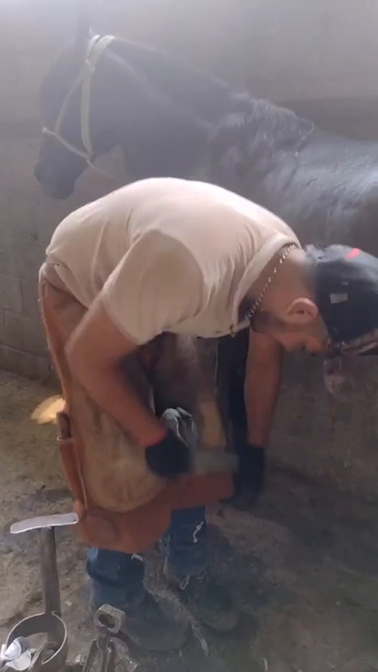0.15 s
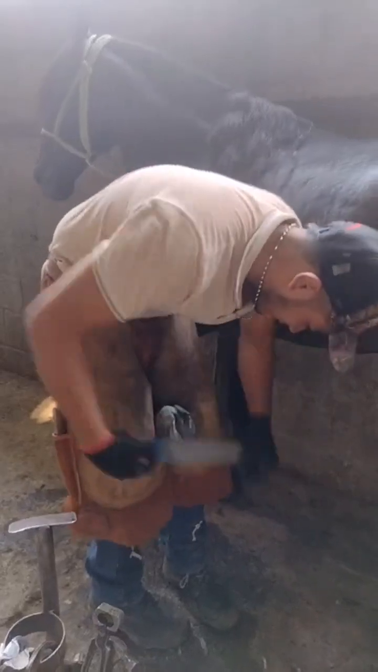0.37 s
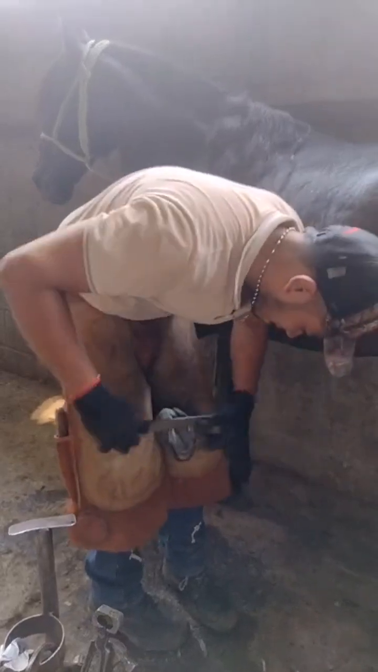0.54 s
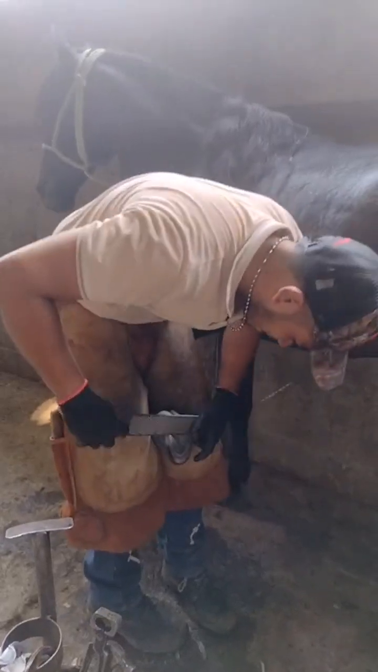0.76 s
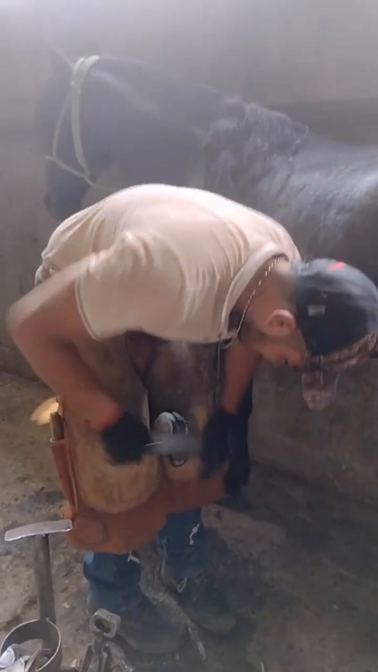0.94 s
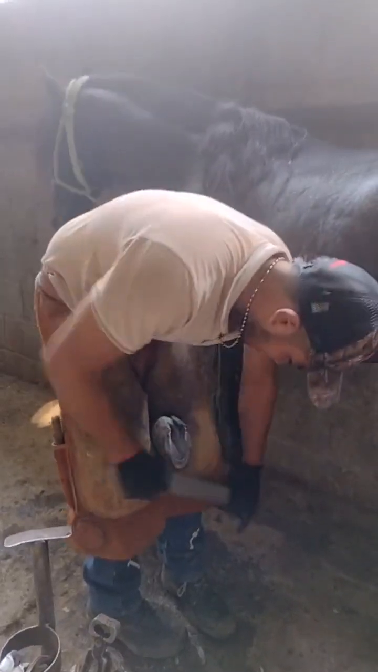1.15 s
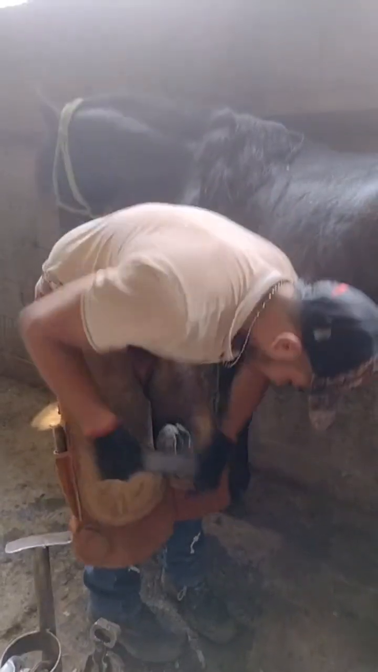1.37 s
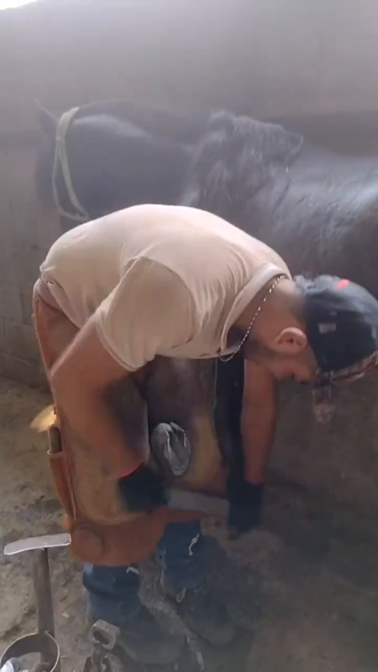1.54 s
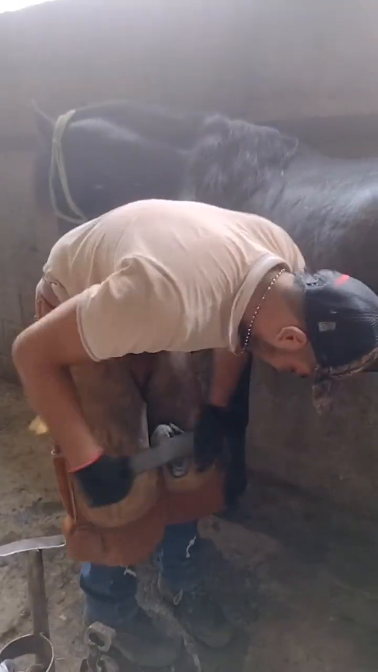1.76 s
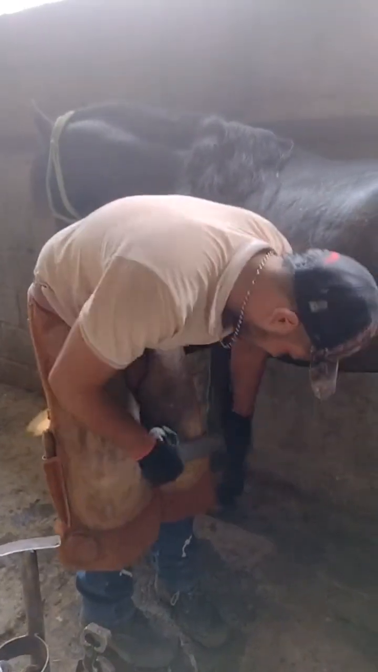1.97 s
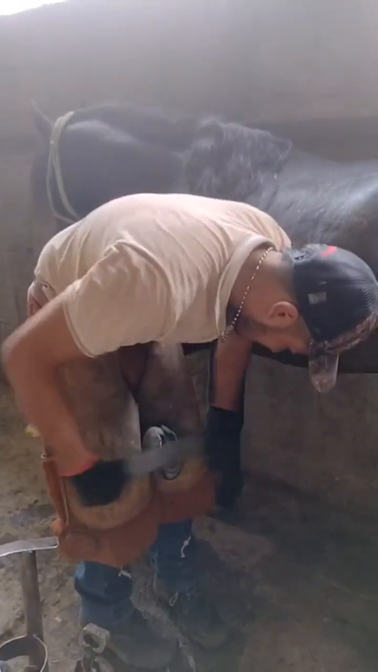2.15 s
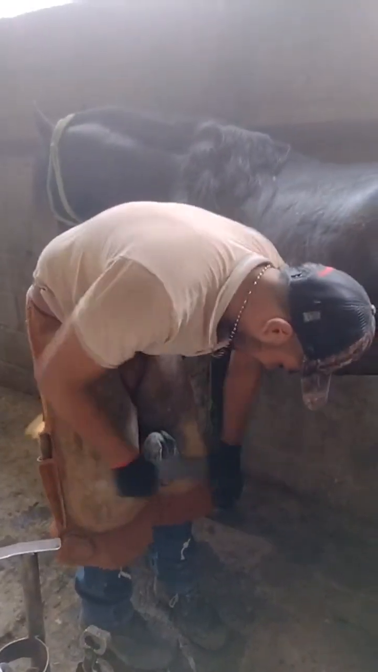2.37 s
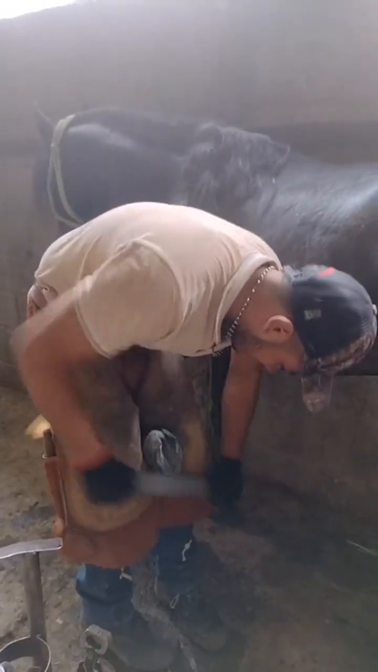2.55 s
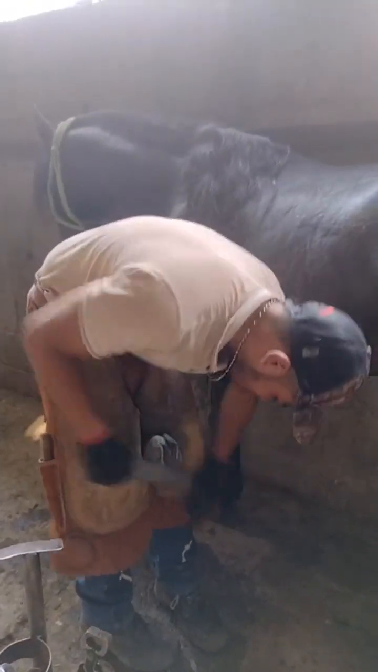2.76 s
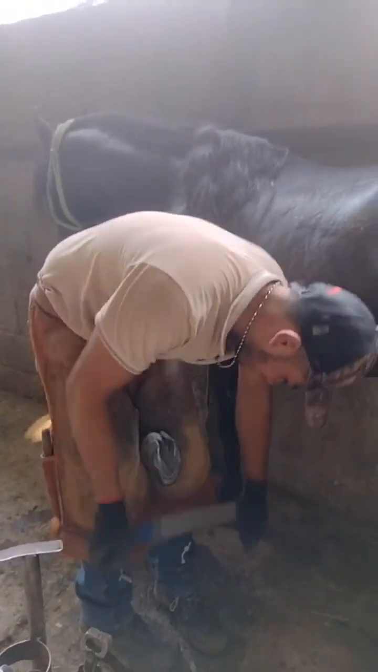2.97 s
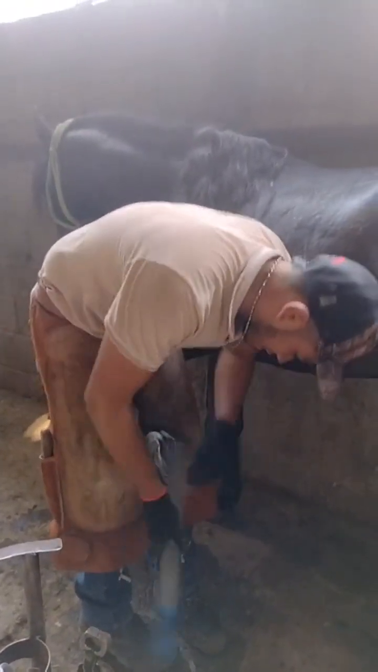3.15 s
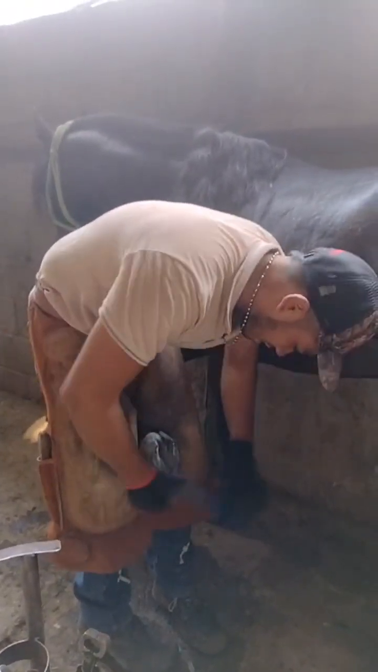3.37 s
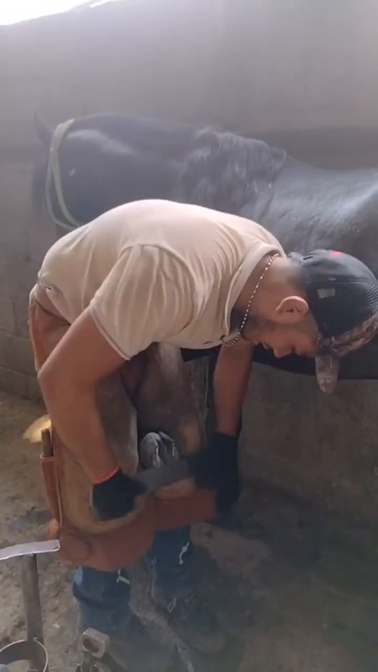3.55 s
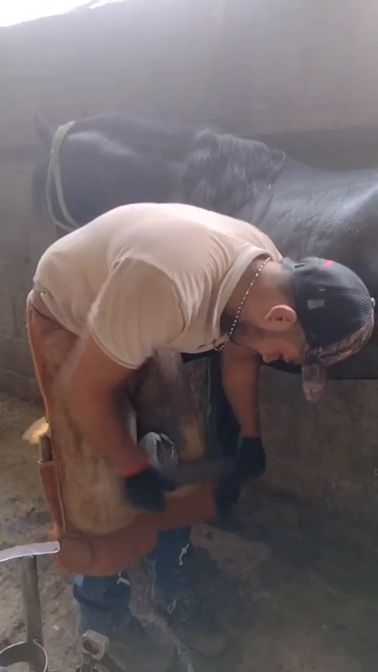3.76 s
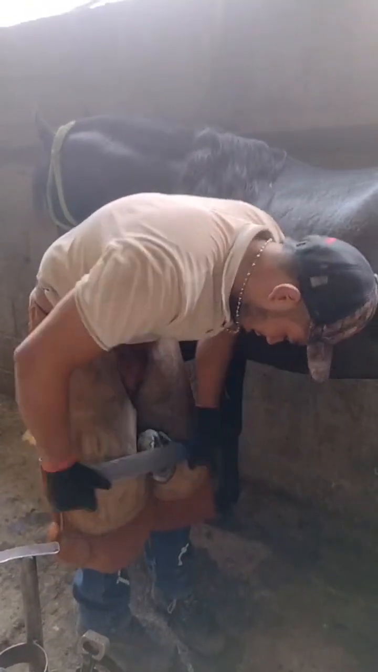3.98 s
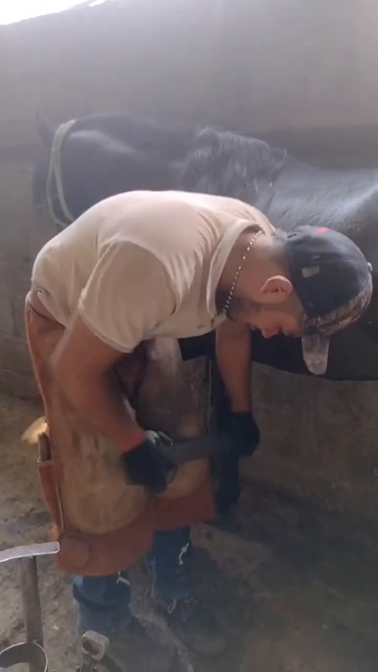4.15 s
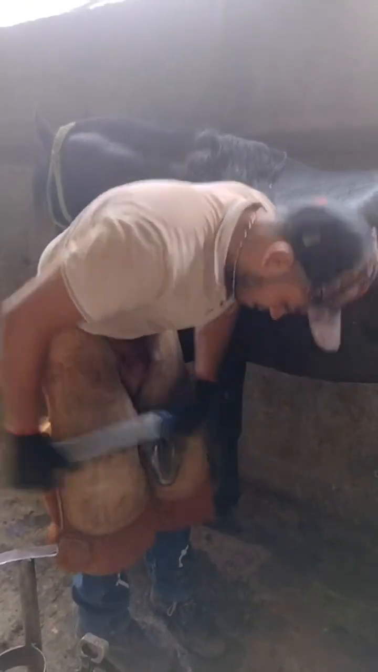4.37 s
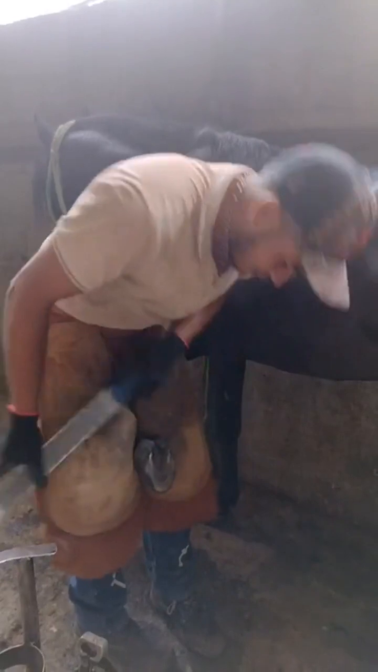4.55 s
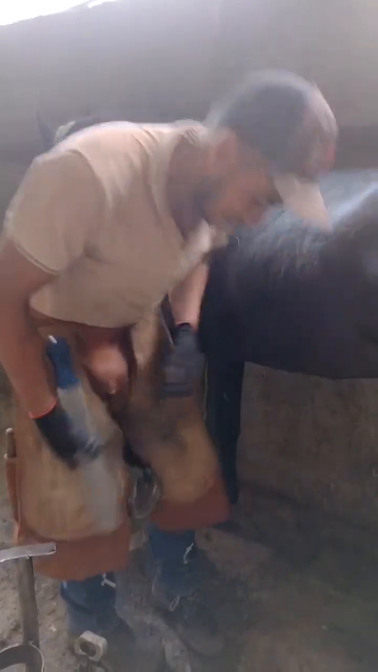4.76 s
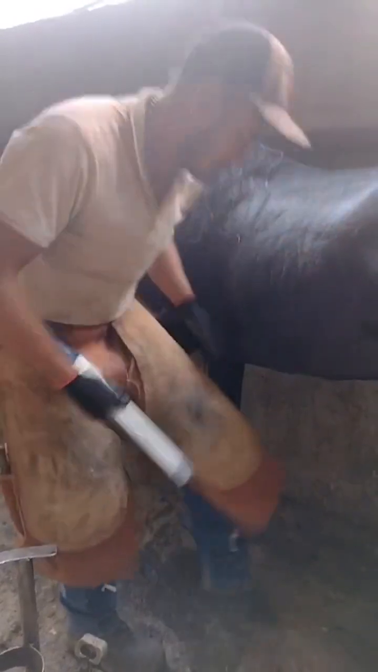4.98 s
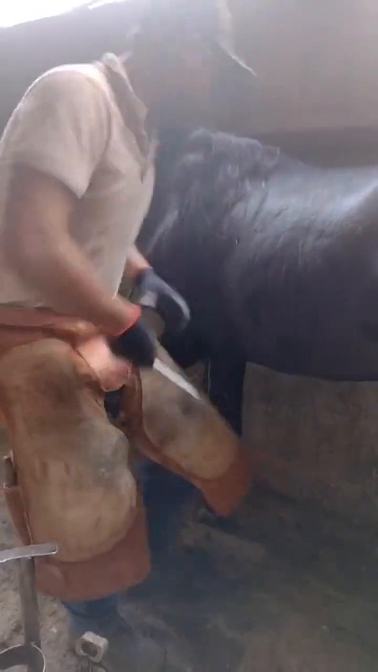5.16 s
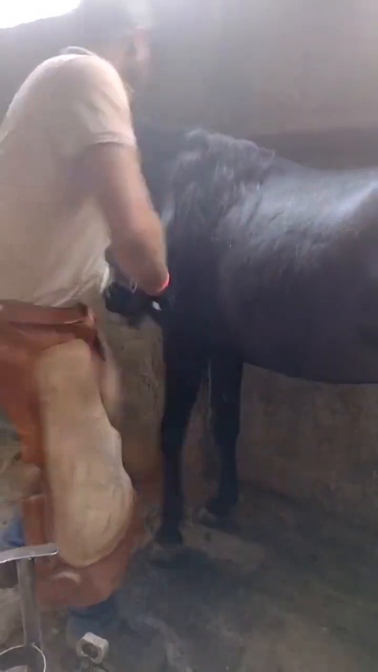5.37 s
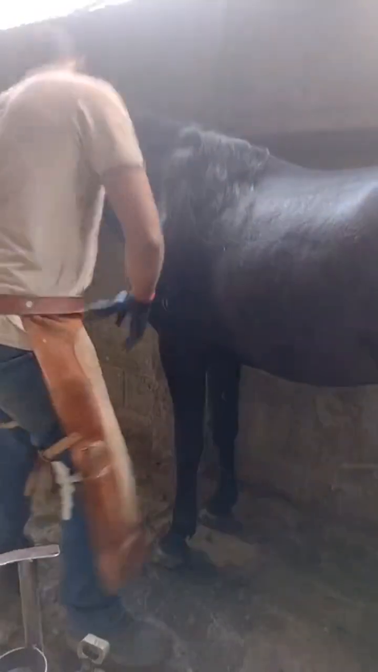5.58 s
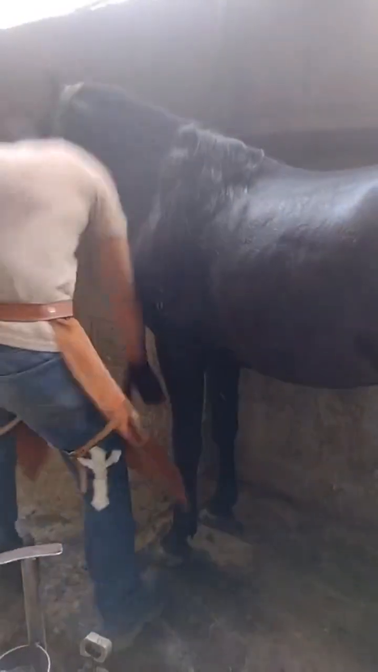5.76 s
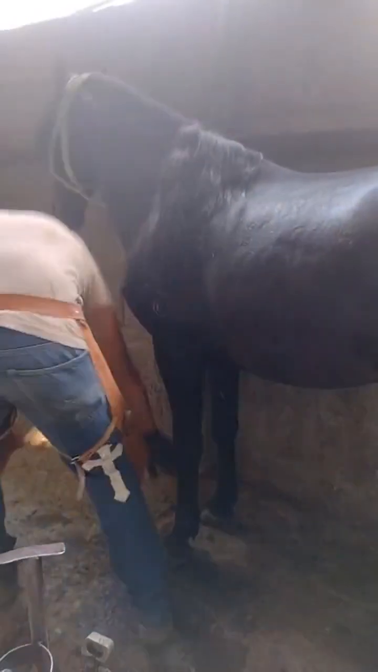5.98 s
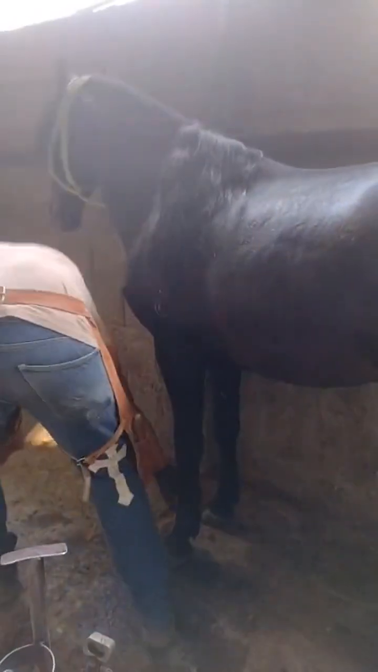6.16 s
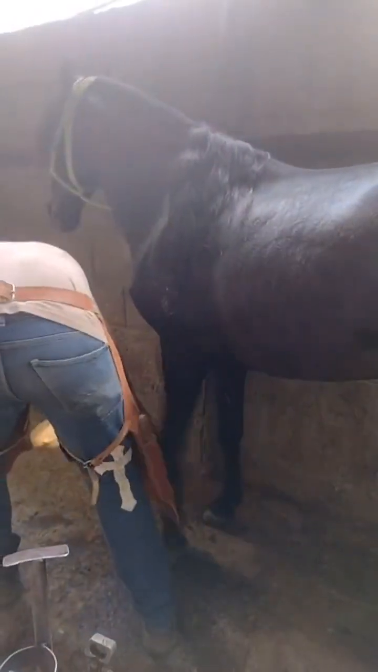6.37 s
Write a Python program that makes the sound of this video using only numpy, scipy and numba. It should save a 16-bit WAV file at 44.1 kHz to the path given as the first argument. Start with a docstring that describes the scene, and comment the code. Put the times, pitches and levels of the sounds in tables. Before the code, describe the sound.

Close by in a small masonry stable, a steel rasp files hoof horn in separate rough strokes, buzzing and hissing with a bright metallic ring. Light knocks and dull leg bumps fall between them. After a heavier thump and clunk, the last strokes grow louder and sharper, with a crackle and brief squeal. Then leather and cloth rustle, a few knocks sound, and it quietens. A small microphone suppresses the faint pauses.

```python
"""A farrier rasps a horse's hoof in a small masonry stable, then lets the leg down and steps away.
Rows of teeth catch the horn at a rate that follows the stroke: they make the hoof buzz and tear off
chips that ring the steel. The rasp knocks as it lands, teeth snag, the leg shudders and bumps, and the
leather apron rustles. Near walls reflect it all; a noise suppressor pushes down the faint pauses."""
import sys
import numpy as np
from scipy import signal
from scipy.fft import rfft, irfft
from scipy.io import wavfile
from scipy.ndimage import uniform_filter1d
from numba import njit

SR = 44100
rng = np.random.default_rng(int(sys.argv[2]) if len(sys.argv) > 2 else 0)


def store_wav(level_fs):
    """Save 16-bit WAV to argv[1]."""
    pcm = np.round(np.clip(np.atleast_2d(level_fs), -1, 1) * 32767)
    wavfile.write(sys.argv[1], SR, pcm.T.astype(np.int16))


N = 283122
TIME = np.arange(N) / SR

# strokes of the rasp; the four levels are peaks before the layer trims:
# start_s, attack_s, hold_s, release_s, hoof_body_db, hoof_buzz_db, steel_rasp_db, chip_hiss_db,
# top_rate_rows_per_s, time_to_top_speed_s, slowing_s, regularity_0_to_1 (mean), blade_ring_hz, blade_ring_db
STROKES = [ (.149, 0.07, 0.08, 0.19, -45, -42.5, -35.5, -41, 410, 0.16, 0.093, .45, 4540, 12.5),
           (.408, .027, 0.011, 0.11, -61, -69, -47.5, -55, 240, 0.0092, 0.14, 0.7, 5200, -2.5),
           (1.004, 0.11, 0.095, .218, -49, -44, -40, -43.5, 540, 0.17, 0.086, .55, 4550, 13),
           (1.494, 0.051, 0.083, 0.2, -65, -48, -39.5, -41, 560, .125, 0.085, .35, 4810, 11),
           (1.938, 0.072, .11, 0.18, -52, -43.5, -41, -46, 645, .185, 0.73, 0.6, 2400, -1.5),
           (2.413, 0.067, 0.087, 0.16, -66, -47, -36.5, -44, 600, .165, 0.27, 0.3, 4582, 5),
           (2.849, 0.07, 0.055, 0.23, -63.5, -51.5, -38, -41, 570, .13, 0.12, 0, 4830, 12.5),
           (3.085, 0.028, .04, 0.08, -86, -104, -57, -65, 340, .01, .15, 0, 2825, -0.5),
           (3.712, 0.064, 0.07, 0.15, -60.5, -56, -48, -53, 700, .09, .12, .3, 6400, -2),
           (3.957, 0.021, .11, .13, -97, -53.5, -42.5, -38.5, 660, 0.1, .1, 0.78, 6190, 0.5),
           (4.19, 0.044, 0.053, 0.15, -47.5, -48.5, -41, -47.5, 560, .08, .08, .25, 4250, 6),
           (4.372, 0.078, 0.0041, 0.16, -50, -36.5, -33, -28, 750, .125, .2, .85, 6520, -10),
           (4.489, 0.033, .034, 0.13, -38.5, -37, -49.5, -67.5, 760, .007, .065, 0.7, 2190, -0.5), ]


def rasp():
    """Each row of teeth loads the horn and lets go: a push on the hoof and a burst of chips."""
    # edges of hoof body, hoof buzz, steel rasp, chip hiss: low_hz, high_hz
    layer_bands = [(150, 380), (380, 1600), (1600, 7000), (7000, 17000)]
    buzz_db = (-1, -1, 2, 0)   # buzz against chips in each layer
    trim_db = (-1, -.5, 0, 0)
    rate, regular, blade_hz, blade_db = stroke_motion()
    # the teeth fall in and out of step by a 0.17 share, about 35 times a second
    regular = np.clip(regular * (1 + 0.17 * drift(35)), 0, .98)
    uneven_rate = rate * (1 + .045 * drift(260))
    phase = 2 * np.pi * np.cumsum(uneven_rate) / SR
    chips = tooth_chips(phase, regular, blade_hz, blade_db)
    buzz = tooth_buzz(phase)
    out = squeals(phase)
    for layer, edges in enumerate(layer_bands):
        chip_part = np.sqrt(1 - regular ** 2) * rms_one(band(chips, edges))
        buzz_part = regular * from_db(buzz_db[layer]) * band(buzz, edges)
        part = chip_part + buzz_part
        # even out the loudness, so that the pressure of the hands sets it
        steady = part / np.sqrt(uniform_filter1d(part ** 2, size=1200) + 1e-9)
        out = out + from_db(trim_db[layer]) * stroke_pressure(layer) * steady
    return out


def stroke_motion():
    """The stroke speeds up and slows down: tooth rate, regularity, and pitch and level of the blade's ring."""
    slow_share, speed_up_s = 0.3, 0.11   # floor of the rate as a share of the top; time to gather speed
    glide_oct_per_s = 1.4   # the main ring rises as the contact runs along the steel
    ring_s, fade_db = 0.092, 27.5   # it rings most in mid-stroke and fades towards both ends
    rows = np.array(STROKES)
    current = np.maximum(np.searchsorted(rows[:, 0], TIME) - 1, 0)
    start, attack, hold, *_, top_rate, speed_peak, slowing, regular, ring_hz, ring_db = rows[current].T
    past_peak = TIME - start - speed_peak
    speed = np.exp(-(past_peak / np.where(past_peak < 0, speed_up_s, slowing)) ** 2)
    rate = top_rate * (slow_share + (1 - slow_share) * speed)
    past_middle = TIME - start - attack - hold / 2
    blade_hz = ring_hz * 2 ** (glide_oct_per_s * np.minimum(past_middle, 2 * ring_s))
    blade_db = ring_db - fade_db * (1 - np.exp(-(past_middle / ring_s) ** 2))
    return rate, regular, blade_hz, blade_db


def stroke_pressure(layer):
    """Gain of one layer of the rasping: each stroke bites in, holds and eases off."""
    # share of the attack that each layer needs: the hoof's body answers first
    attack_share = (0.65, 0.95, 0.97, 1.03)
    # how far each layer lies under its peak, in dB: at the start, at the end of the hold
    # (a negative value lies above), and as the rasp lifts off
    entry_db = (14, 17.4, 23.8, 25.2)
    sag_db = (7.5, 0.5, 0.6, -1.85)
    exit_db = (22, 38, 40.4, 36.6)
    touch_s, lift_s = 0.017, 0.019   # time the teeth take to meet the horn, and to leave it
    out = np.zeros(N)
    for start, attack, hold, release, *peak_db in STROKES:
        held = attack + hold
        corners = start + np.array([0, min(attack * attack_share[layer], held), held, held + release])
        drop_db = np.interp(TIME, corners, [entry_db[layer], 0, sag_db[layer], exit_db[layer]])
        contact = np.minimum((TIME - start) / touch_s, (corners[-1] - TIME) / lift_s)
        out += from_db(peak_db[layer] - drop_db) * np.clip(contact, 0, 1)
    return out


def tooth_chips(phase, regular, blade_hz, blade_db):
    """Horn fractures in bursts as each row catches; the chips ring the hoof and the steel."""
    # broad colour of the rasping: freq_hz, density_db_per_hz
    rasp_colour = [(29, -50.5), (50, -5.5), (81, 2.5), (146, -21), (177, -4), (387, -7.5), (586, -3.5),
                   (747, -11.5), (824, -13), (1590, -16.5), (3380, -5.5), (4760, -6.5), (12000, -3.5),
                   (15300, -4), (16900, -48.5)]
    # fixed ringing of hoof and steel: freq_hz, width_hz, level_db
    rasp_modes = [(580, 49, -4), (960, 110, 4), (1065, 190, 2), (1870, 130, 6), (2360, 290, 1.5),
                  (2940, 130, -11.5), (6700, 170, -17), (6600, 45, -25), (10200, 1700, -3)]
    catching = rms_one(np.exp(0.67 * regular * np.cos(phase)))   # 0.67: sharpness of the teeth
    chips = grains(per_s=14000, spread_db=2.0) * catching * from_db(1.0 * drift(140))
    chips = colour(chips, rasp_colour)
    shifting = wandering_modes(chips, 750, 10000, width_hz=75, swing_db=8.5, rate=35, bend=.04, count=36)
    chips = chips + ring(chips, rasp_modes) + shifting
    return chips + from_db(blade_db) * moving_ring(chips, blade_hz, width=800)


def tooth_buzz(phase):
    """The pushes on the hoof form a buzz whose overtones waver as the blade rocks."""
    overtones = 0
    for k in range(2, 9):
        partial = np.cos(k * phase + rng.uniform(0, 2 * np.pi)) / k ** 0.77
        overtones = overtones + partial * from_db(3.1 * drift(45))
    return from_db(4.2 * drift(90)) * (np.cos(phase) + from_db(-7) * overtones) * np.sqrt(2)


def squeals(phase):
    """The teeth lock in step with the horn: a brief pure tone at the tooth rate."""
    # squeals: centre_s, peak_db, half_length_s (to 1/e)
    squeal_rows = [(0.227, -41.5, 0.029), (1.217, -47.5, 0.015), (1.561, -41, 0.014), (2.082, -38, 0.0039),
                   (2.178, -53, 0.095), (3.996, -43.5, 0.012), (4.432, -26.5, 0.0064), (4.51, -30, 0.009),
                   (4.525, -27.5, 0.0031)]
    strength = sum(from_db(db) * np.exp(-((TIME - s) / length) ** 2) for s, db, length in squeal_rows)
    return strength * np.cos(phase)


def knocks():
    """Steel lands on horn with a short clatter that rings the hoof; glancing touches swell more slowly."""
    # rasp and hoof knocks, levels before trim and envelope:
    # start_s, low_body_db, middle_db, top_db, attack_s
    knock_rows = [ (0.111,-58.5,-53.5,-47,0.0019), (0.53,-68,-79,-54,0.0011),
                  (0.757,-44.5,-52,-69.5,0.0011), (0.848,-67,-59.5,-68,0.0043),
                  (1.014,-36.5,-72,-64,0.0012), (1.474,-48.5,-50,-48.5,0.0018),
                  (1.941,-79,-45,-52.5,0.0017), (2.383,-51,-42,-61.5,0.0014),
                  (2.817,-54.5,-55.5,-43,0.0026), (3.223,-115,-98,-61,0.0041),
                  (3.624,-38.5,-29.5,-41.5,0.002), (4.861,-75,-49,-33,0.011), (4.989,-69,-35,-36,0.0046),
                  (5.023,-45.5,-39.5,-60,0.0026), (6.02,-79,-59.5,-64,0.0042), (6.387,-68.5,-66,-74,0.002)]
    # ringing of the struck hoof: freq_hz, width_hz, level_db
    knock_modes = [(130, 60, -15), (237, 56, 11.5), (605, 290, 6), (722, 49, -10.5), (983, 14, -0.5),
                   (2430, 250, -3.5), (4400, 1800, -11)]
    # edges of low body, middle, top: low_hz, high_hz
    knock_bands = [(100, 400), (400, 1600), (1600, 17000)]
    t60s, trim_db = (.09, .08, .07), (2, 2, 2)   # decay in s and trim of each band
    clatter = grains(per_s=12000, spread_db=-4.5)
    clatter = ring(clatter, knock_modes) + from_db(-19.0) * clatter
    rises = [1 - np.exp(-np.maximum(TIME - row[0], 0) / row[-1]) for row in knock_rows]
    out = 0
    for k, edges in enumerate(knock_bands):
        strength = 0
        for row, rise in zip(knock_rows, rises):
            strength = strength + from_db(row[1 + k] + trim_db[k]) * decay(row[0], t60s[k]) * rise
        out = out + strength * rms_one(band(clatter, edges))
    return out


def snaps():
    """A sharp crack, a spray of splinters, then the steel's brief bright shimmer."""
    # teeth snagging and grit cracking, before colouring: start_s, level_db
    snap_rows = [(1.134, -22), (1.141, -23), (1.529, -29), (2.432, -39), (3.094, -35), (3.115, -29),
                 (3.626, -34), (4.168, -22.5), (4.179, -10), (4.185, -9.5), (4.1895, -8.5), (4.197, -9.5),
                 (4.1996, -15), (5.607, -47)]
    # colour of the cracks: freq_hz, density_db_per_hz
    snap_colour = [(100, -22), (500, -4), (1500, -4.5), (4000, -1.5), (6500, -5.5), (10000, 5),
                   (16000, -4.5)]
    power = 0
    for s, db in snap_rows:
        spray = from_db(-19) * decay(s, t60=0.021)
        tail = from_db(-26) * decay(s, t60=0.18)
        power = power + (from_db(db) * (spray + tail)) ** 2
    cracks = np.sqrt(power) * rng.standard_normal(N)
    for s, db in snap_rows:
        cracks[round(s * SR)] += from_db(db + 3)   # the crack itself: one click
    cracks = colour(cracks, snap_colour)
    return cracks + ring(cracks, [(9706, 1000, -15.5), (5947, 940, 9.0)])


def thumps():
    """Soft, heavy contacts: one damped low mode each."""
    # dull bumps of the leg and boots, levels before attack and decay: start_s, level_db, pitch_hz, t60_s
    thump_rows = [(0.343, -39, 110, 0.087), (0.621, -34.5, 223, 0.067), (0.643, -39.5, 240, 0.054),
                  (.682, -37.5, 233, 0.049), (1.014, -42, 127, 0.12), (2.117, -24.5, 293, 0.061),
                  (2.121, -33.5, 124, 0.041), (2.267, -46, 194.3, 0.14), (3.321, -46, 187, 0.11),
                  (3.337, -40, 131, 0.051), (3.36, -32.5, 100.6, 0.23), (3.626, -22, 123.2, 0.058),
                  (4.547, -22.5, 205, 0.08), (5.204, -22.5, 247, 0.024), (5.255, -32.5, 235, 0.057)]
    attack_s = 0.0065
    out = np.zeros(N)
    for s, db, hz, t60 in thump_rows:
        age = np.maximum(TIME - s, 0)
        envelope = decay(s, t60) * (1 - np.exp(-age / attack_s))
        out += from_db(db) * envelope * np.sin(2 * np.pi * hz * age)
    return out


def leg():
    """The horse's leg and the farrier's knees take up strokes and shifts of weight as a low shudder."""
    # shudders of the held leg: start_s, rise_s, fall_s, level_db
    shudder_rows = [(.275, 0.031, 0.33, -50), (1.002, 0.052, .3, -47.5), (1.229, 0.066, .2, -57),
                    (1.499, 0.094, 0.21, -67), (1.95, 0.2, 0.11, -50.5), (2.171, 0.087, 0.092, -55),
                    (3.305, 0.049, 0.098, -36), (3.38, 0.055, 0.59, -49), (4.53, .03, .2, -62),
                    (5.21, 0.035, 0.11, -58)]
    strength = sum(from_db(db) * swell(start, rise, fall) for start, rise, fall, db in shudder_rows)
    body = ring(band(rng.standard_normal(N), (62, 190)), [(104, 35, 3.5), (141, 90, -7.0)])
    return strength * body / np.sqrt(uniform_filter1d(body ** 2, size=2200) + 1e-12)


def apron():
    """Leather and cloth slide in clumps of small slips; the folds colour them as they shift."""
    # movements of apron, sleeves and boots, levels before trim:
    # start_s, rise_s, fall_s, flapping_db, rubbing_db, scuffing_db, swish_db
    rustle_rows = [ (-.01, 0.01, 0.17, -65, -60.5, -65, -53.5), (.081, 0.046, 0.032, -71, -81, -88, -58),
                   (0.564, 0.036, 0.24, -78, -94, -72, -61.5), (0.844, .01, 0.11, -84, -54, -60.5, -56.5),
                   (2.796, 0.022, 0.15, -60, -65, -75, -61), (3.239, 0.042, 0.36, -85, -93, -86, -55),
                   (3.261, 0.35, 0.55, -56.5, -49, -54, -49), (3.305, 0.027, 0.12, -37, -46.5, -52.5, -51),
                   (3.47, 0.17, 0.15, -59, -48.5, -50, -57), (4.093, .02, 0.23, -54.5, -64, -59, -55),
                   (4.301, 0.043, 0.17, -51.5, -57, -61, -61.5), (4.56, 0.16, 0.34, -62, -57.5, -63.5, -53),
                   (4.713, 0.14, 0.25, -88, -59.5, -53, -49), (4.91, 0.11, 0.28, -60.5, -50, -52.5, -48),
                   (5.109, 0.093, 0.31, -52, -61.5, -60.5, -55.5),
                   (5.523, 0.015, 0.045, -64.5, -76, -60.5, -57),
                   (5.583, 0.017, 0.43, -75, -91, -80.5, -51), (5.657, 0.016, 0.16, -82, -59, -74, -61),
                   (5.757, 0.033, 0.37, -70, -53.5, -54, -49),
                   (6.06, 0.071, 0.28, -64, -55.5, -59.5, -56.5),
                   (6.134, 0.083, 0.27, -55, -56, -67.5, -74), ]
    # colour of the slips: freq_hz, density_db_per_hz
    rustle_colour = [(29, -48), (50, -25.5), (65, -27.5), (96, 3.5), (189, 1), (298, 3.5), (380, -10),
                     (572, 4.5), (1330, -10), (1540, -4), (1700, -11), (3500, -7.5), (12000, -8),
                     (16000, -14.5)]
    # edges of flapping, rubbing, scuffing, swish: low_hz, high_hz
    rustle_bands = [(125, 380), (380, 1100), (1100, 2600), (2600, 17000)]
    trim_db = (.5, .5, .5, .3)
    slips = grains(per_s=8000, spread_db=1.5) * from_db(1.5 * drift(110))
    slips = colour(slips, rustle_colour)
    folds = ring(slips, [(422, 61, 4), (620, 340, 2.5), (713, 64, -9.5), (1680, 170, 0)])
    shifting = wandering_modes(slips, 450, 9000, width_hz=35, swing_db=8, rate=24, bend=0.075, count=22)
    slips = slips + folds + from_db(-1) * shifting
    power = 0
    for start, rise, fall, *peak_db in rustle_rows:
        power = power + np.outer(from_db(peak_db), swell(start, rise, fall)) ** 2
    layers = zip(rustle_bands, np.sqrt(power), trim_db)
    return sum(from_db(db) * gain * rms_one(band(slips, edges)) for edges, gain, db in layers)


def stable(x, wall_cut_hz=6000, delay_s=0.00093, t60_s=0.35):
    """Dense, slightly dull reflections from the near walls: decaying low-passed noise as a response."""
    dull = signal.butter(1, wall_cut_hz, fs=SR, output="sos")
    tail = signal.sosfilt(dull, rng.standard_normal(N)) * decay(delay_s, t60_s)
    return signal.fftconvolve(x, tail[:SR] / np.sqrt(np.sum(tail ** 2)))[:N]


def air(level_db=-67):
    """Faint, steady air noise: coloured random pressure."""
    # colour of the air noise: freq_hz, density_db_per_hz
    floor_colour = [(30, 11.5), (100, -8), (500, -37), (2000, -31.5), (8000, -19), (16000, -15)]
    return from_db(level_db) * rms_one(colour(rng.standard_normal(N), floor_colour))


def wandering_modes(x, low_hz, high_hz, width_hz, swing_db, rate, bend, count):
    """Many close modes, each swelling, fading and bending as the point of contact moves."""
    place = (np.arange(count) + rng.random(count)) / count
    pitches = np.minimum(low_hz * (high_hz / low_hz) ** place, SR / 3)
    bends = [1 + bend * drift(12) for _ in range(7)]
    out = 0
    for k, hz in enumerate(pitches):
        gain = from_db(swing_db * np.clip(drift(rate), -2, 1.3))
        out = out + (-1) ** k * gain * moving_ring(x, hz * bends[k % len(bends)], width_hz)
    return out


def moving_ring(x, hz, width):
    """A resonance that follows a pitch curve."""
    return sweep(x, 2 * np.pi * hz / SR, np.exp(-np.pi * width / SR))


@njit
def sweep(x, angle, r):
    """Two-pole resonance whose centre (radians per sample) may move."""
    out = np.zeros(len(x))
    for i in range(2, len(x)):
        push = (1 - r * r) / 2 * (x[i] - x[i - 2])
        out[i] = push + 2 * r * np.cos(angle[i]) * out[i - 1] - r * r * out[i - 2]
    return out


def ring(x, modes):
    """Parallel resonances."""
    return sum(from_db(db) * signal.lfilter(*resonator(hz, width), x + 1e-18) for hz, width, db in modes)


def resonator(hz, width):
    """Coefficients of a resonance with gain 1 on top."""
    r = np.exp(-np.pi * width / SR)
    return (1 - r * r) / 2 * np.array([1, 0, -1]), [1, -2 * r * np.cos(2 * np.pi * hz / SR), r * r]


def grains(per_s, spread_db):
    """Tiny fractures or slips at random moments and of uneven size."""
    born = rng.random(N) < per_s / SR
    size = from_db(spread_db * np.clip(rng.standard_normal(N), -2, 2))
    return rms_one(born * rng.choice([-1, 1], N) * size)


def drift(rate):
    """Smooth chance of rms 1, changing about rate times a second."""
    knots = rng.standard_normal(N // 8)
    return rms_one(np.interp(TIME * rate, np.arange(len(knots)), knots))


def swell(start, rise, fall):
    """A movement builds up evenly, then settles to rest."""
    settling = np.clip(1 - (TIME - start - rise) / fall, 0, 1) ** 2.98   # power: how steeply it dies away
    return np.clip((TIME - start) / rise, 0, 1) * settling


def decay(s, t60):
    """Envelope that starts at s and falls 60 dB in t60 seconds, down to -180 dB."""
    return (TIME >= s) * from_db(-60 * np.clip((TIME - s) / t60, 0, 3))


def band(x, edges):
    """Band-pass with steep sides."""
    return signal.sosfilt(signal.butter(4, edges, "band", fs=SR, output="sos"), x)


def colour(x, points):
    """Causal (minimum-phase) filter with the given spectrum."""
    hz, db = np.transpose(points)
    grid = np.linspace(1, SR / 2, 2049)
    cepstrum = irfft(np.log(from_db(np.interp(np.log(grid), np.log(hz), db))))
    # fold the cepstrum onto positive times: the response then starts at once
    cepstrum[1:2048] *= 2
    cepstrum[2049:] = 0
    return signal.fftconvolve(x, irfft(np.exp(rfft(cepstrum))))[:N]


def from_db(db):
    """Decibels to gain."""
    return 10 ** (np.asarray(db) / 20)


def rms_one(x):
    """Scale to rms 1."""
    return x / np.sqrt(np.mean(x ** 2) + 1e-20)


def scene():
    """All sources close by, their reflections in the stable, and faint air noise."""
    near = rasp() + knocks() + snaps() + thumps() + leg() + apron()
    return (near + from_db(-14.5) * stable(near) + air())[None]


def record(dry, low_cut_hz=42, top_cut_hz=15900, threshold_db=-63, depth_db=20, slope=4.24):
    """The small microphone loses the bass; a noise suppressor pushes down whatever is faint; the top is cut."""
    dry = signal.sosfilt(signal.butter(2, low_cut_hz, "high", fs=SR, output="sos"), dry)
    level_db = 10 * np.log10(np.maximum(uniform_filter1d(dry ** 2, size=400), 1e-14))
    # slope: dB of reduction per dB under the threshold
    gated = dry * from_db(np.clip(slope * (level_db - threshold_db), -depth_db, 0))
    return signal.sosfilt(signal.ellip(10, .1, 70, top_cut_hz, fs=SR, output="sos"), gated)


dry = scene()
out = record(dry)
store_wav(out)
```